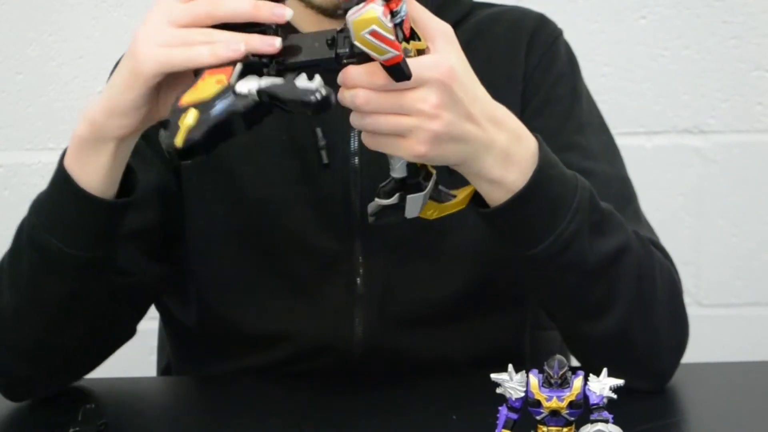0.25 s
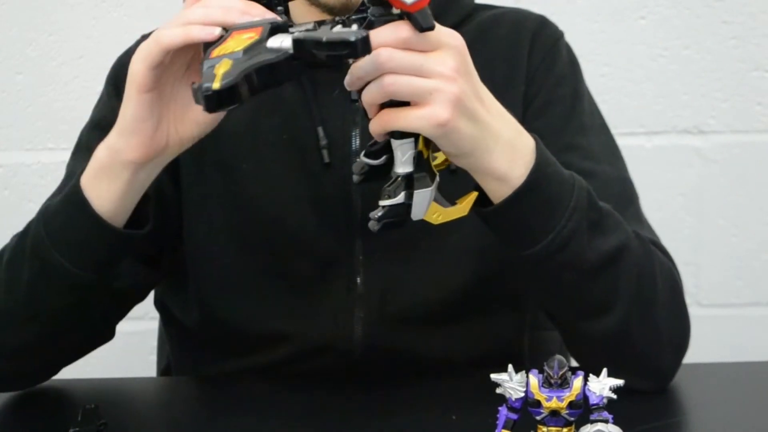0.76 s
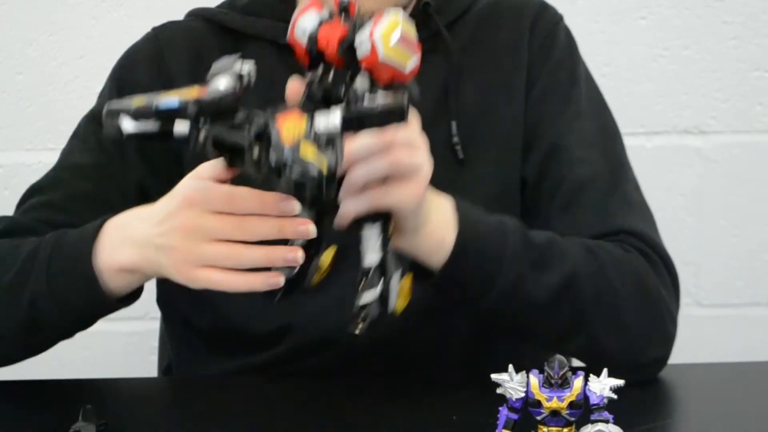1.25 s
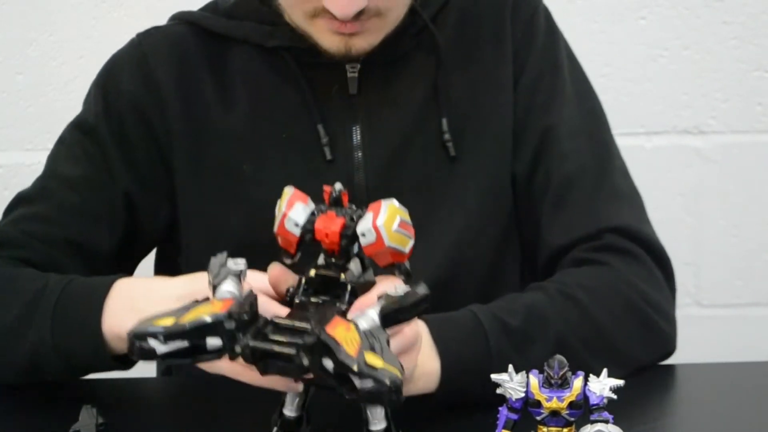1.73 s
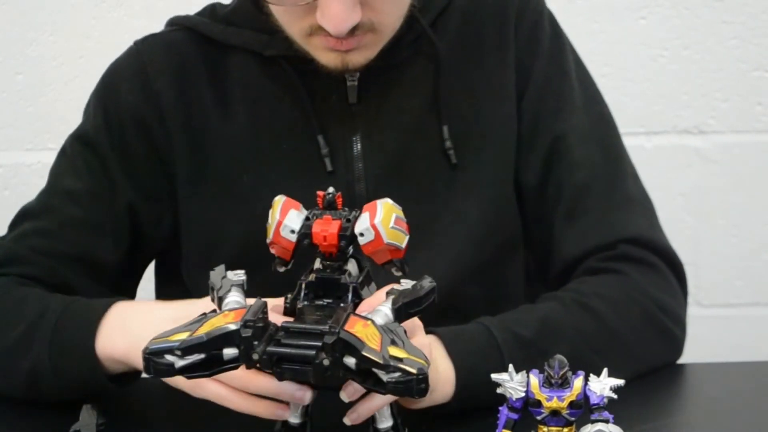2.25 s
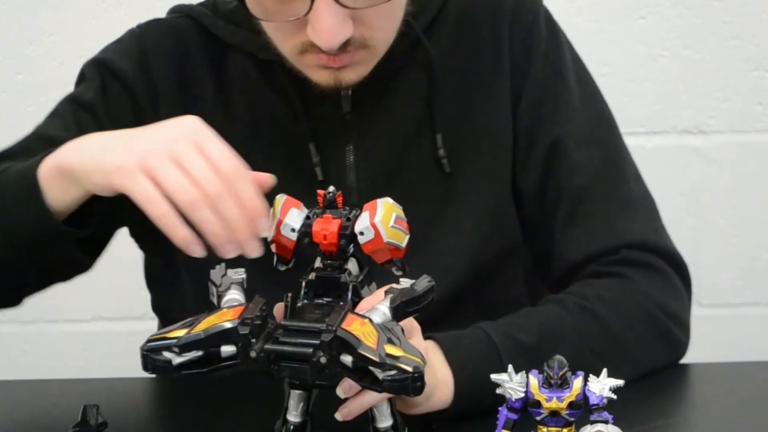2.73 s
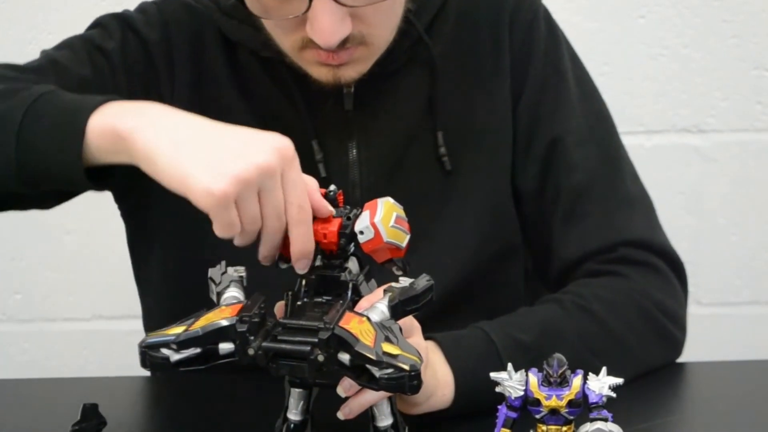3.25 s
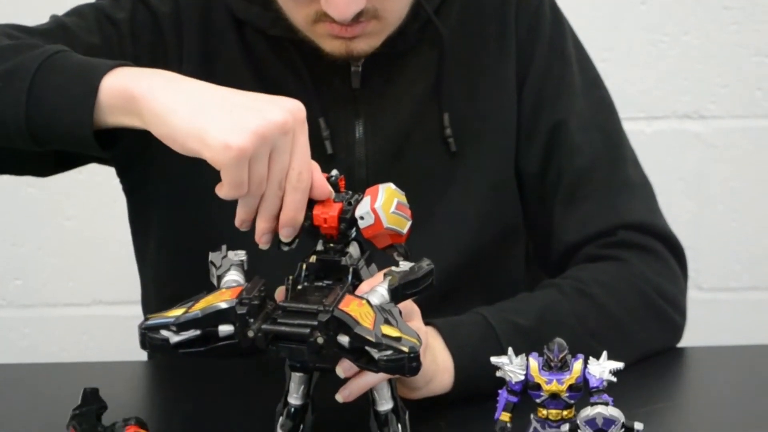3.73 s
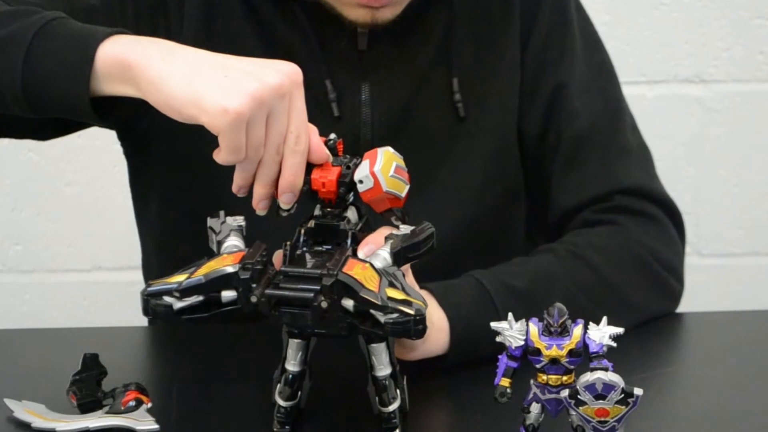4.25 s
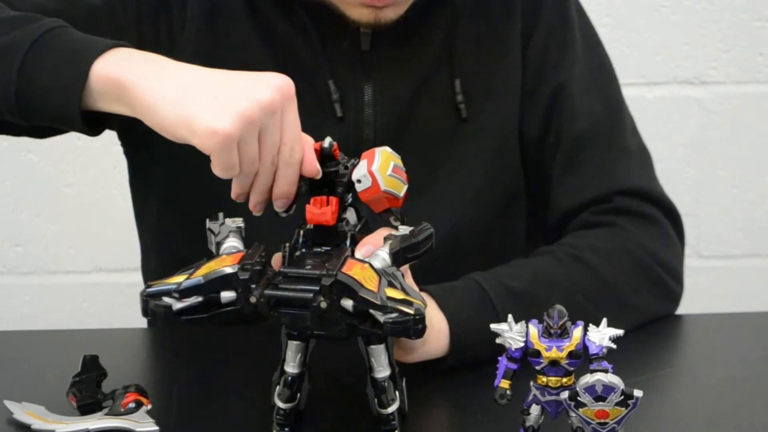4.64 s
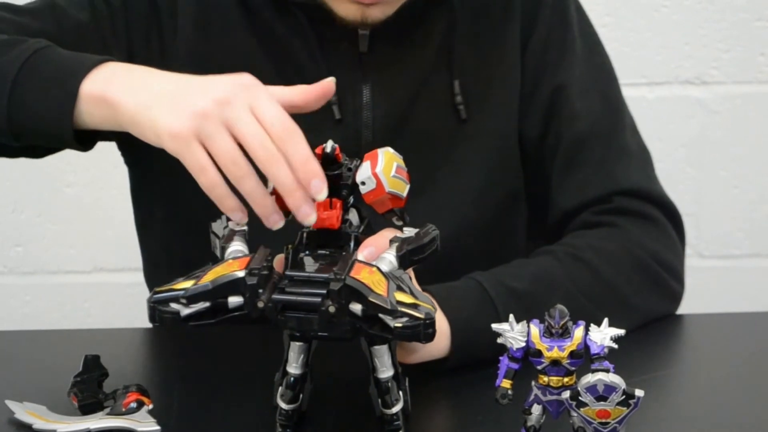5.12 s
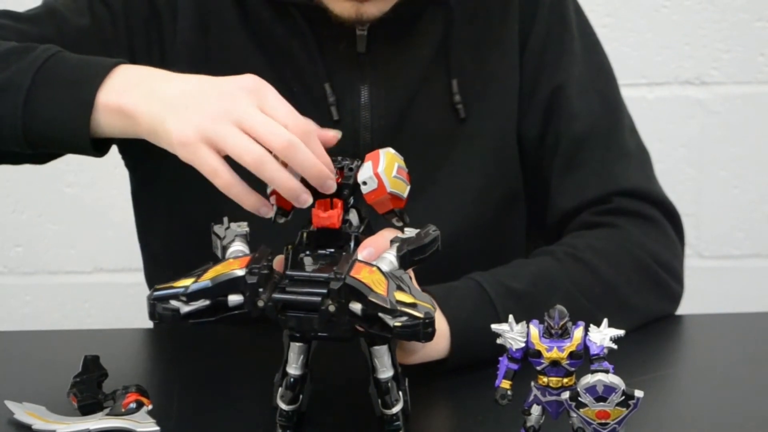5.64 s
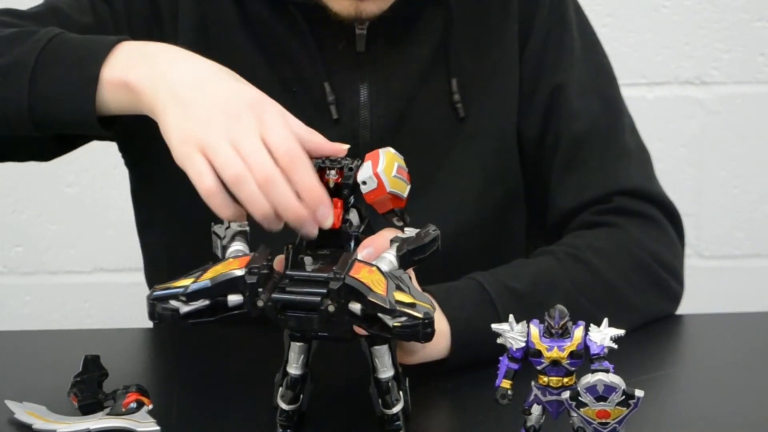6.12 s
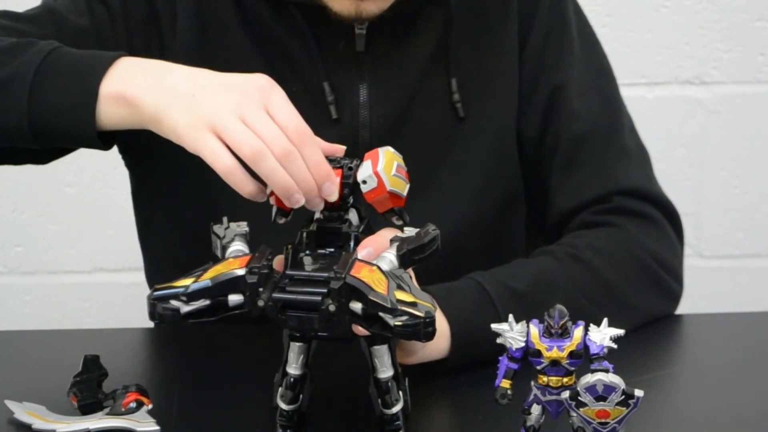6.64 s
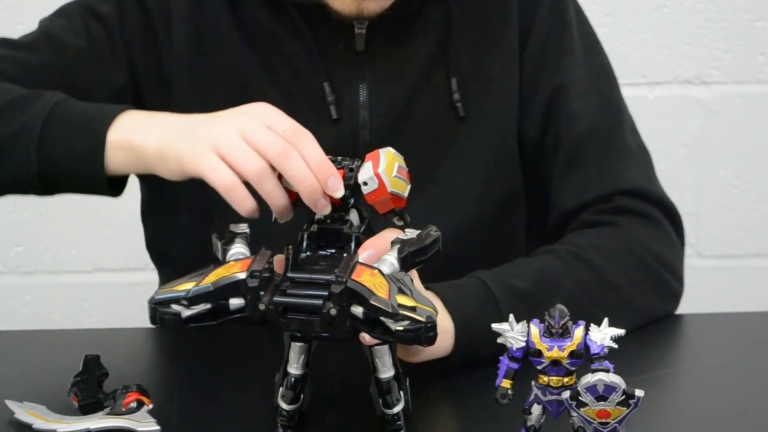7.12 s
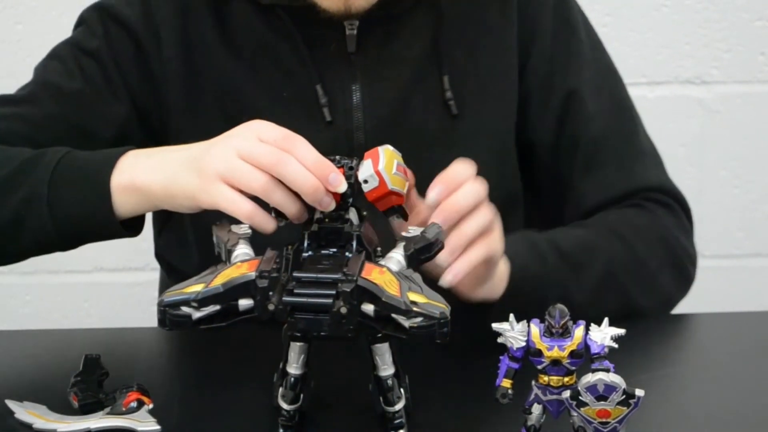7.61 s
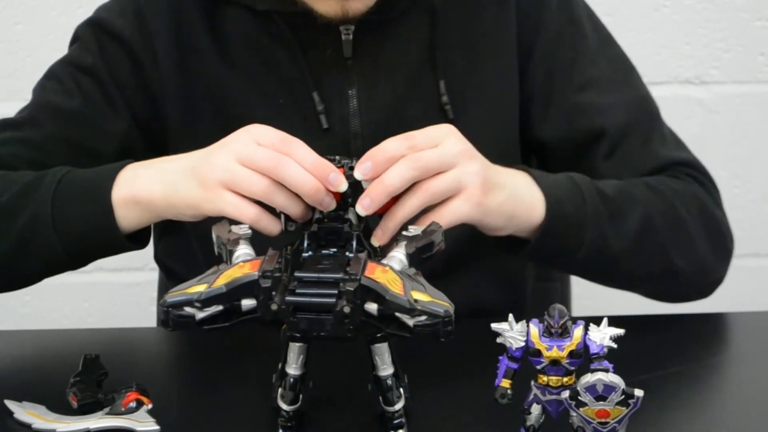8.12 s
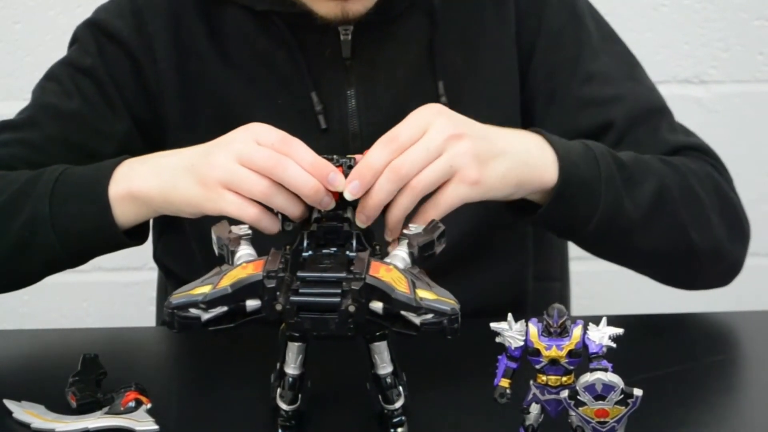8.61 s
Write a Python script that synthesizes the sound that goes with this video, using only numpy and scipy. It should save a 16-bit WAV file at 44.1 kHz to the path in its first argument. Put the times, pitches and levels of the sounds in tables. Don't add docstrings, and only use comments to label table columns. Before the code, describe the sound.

A hard plastic jointed toy is reconfigured by hand at a table, heard from about a metre in a bare room with short, lively echoes and a faint steady air hum. From 0 to 0.5 s loose parts rattle, dull turning sharp, with firm clicks and two brief hollow hinge scrapes gliding downward. It is sparse until about 1.8 s, when the feet clack onto the table with a hollow knock. Quick light ticks cluster at 2-2.7 s, then crisp clicks come irregularly from 2.7 to 4.5 s. At 4.63 s a lid cracks free and stops hard, a very loud double snap. Clicks resume at 4.8-5.7 s, thicken from 6 s, and a lock snaps loudly at 6.73 s. A firm click lands at 7.05 s, followed by lighter touches, a bright click at 8.15 s and final clicks near 8.7-8.8 s.

```python
import sys
import numpy as np
from scipy import signal
from scipy.fft import rfft, irfft
from scipy.io import wavfile

SR = 44100
rng = np.random.default_rng(int(sys.argv[2]) if len(sys.argv) > 2 else 0)


def materialize(psi):
    bounded = np.clip(np.atleast_2d(psi).T, -1, 1)
    quanta = np.round(bounded * 32767).astype(np.int16)
    wavfile.write(sys.argv[1], SR, quanta)


def volts_from_decibels(level):
    exponent = np.asarray(level, float) / 20
    return 10 ** exponent


N = 391166
SIZE = 2048
BINS_HZ = np.arange(SIZE // 2 + 1) * SR / SIZE

# f/Hz, level/dB per Hz
AIR_COLOUR = [(15, -31), (25, -10), (141, -4.5), (218, -10.5), (281, -7), (344, -7), (619, -4.5),
              (862, -7.5), (2450, -9.5), (2640, -9), (3320, -14), (11000, -43), (14300, -66), (22000, -120)]
# f/Hz, level/dB
MICROPHONE = [(30, -16.5), (200, 1), (5600, 0), (6000, 1.5), (7400, 1.5), (8000, -3.5), (8700, 3),
              (10200, -5), (11300, -19), (12200, -52), (13200, -20), (14800, -17), (16000, -53)]
# t/s after the sound, level/dB
ECHOES = [
    (.0029, -7),
    (.0065, -16),
    (.0102, -13),
    (.0222, -12),
    (.0335, -16),
]
# f/Hz, level/dB
FACING = [(200, -10), (1500, -2), (2800, 1), (3400, 3.5), (3900, 2), (4400, 3.5), (5100, 6.5), (5650, 6.5),
          (5900, 1), (12000, -3.5)]
# f/Hz, time to fall 60 dB/s, level/dB
TAIL = [(149, 0.96, -37), (404, 0.76, -26.5), (1040, 0.51, -25.5), (2320, 0.49, -22.5), (4340, 0.5, -26.5),
        (5480, 0.43, -26), (5770, 0.41, -29), (9400, 0.3, -30.5), (14900, .26, -33)]
# f/Hz, width/Hz, level/dB
ROOM_MODES = [(698, 8.1, 13), (1180, 130, 4.5)]
# f/Hz, time to fall 60 dB/s, level/dB
STANDING_WAVES = [(119.5, 0.69, -50), (234, 0.4, -49.5), (294.6, 0.59, -48), (341, 0.39, -52),
                  (455, 0.28, -40.5), (491.6, 0.4, -46.5)]
MOVES_S = 0.3

# t/s, level/dB, dullness/dB
RATTLE = [
    (0.0, -47.5, 7.5),
    (0.34, -46, -41),
    (0.64, -60.5, 7),
    (5.01, -58, 9),
    (5.21, -61.5, 13),
    (6.87, -53, 8.5),
    (7.829, -60, 7),
    (8.87, -60.5, 15),
]
# t/s, level/dB, f/Hz
HINGE = [
    (.085, -60, 1450),
    (.097, -35, 1399),
    (0.139, -42, 1280),
    (.152, -31, 1180),
    (.208, -30, 981),
    (0.254, -43, 930),
    (0.319, -57, 1300),
    (.37, -33, 1250),
    (.44, -48, 1200),
]
# t/s, peak level/dB, f/Hz
HOLLOW_KNOCKS = [(1.1145, -42, 2320), (1.2177, -44, 1160), (1.516, -41, 1670), (1.836, -29, 455),
                 (1.836, -35.5, 342), (3.017, -37, 1520), (3.54, -33, 2400), (3.534, -39, 3100),
                 (5.6923, -40, 1240), (6.0498, -32, 1220), (5.588, -45, 4700), (6.14, -52, 8400),
                 (6.161, -31, 8250), (6.1665, -47, 1704), (7.313, -38, 1040), (8.0366, -33, 2340),
                 (8.151, -30, 2270), (8.154, -25, 7000), (8.6971, -35.5, 2130),
                 (0.0947, -37, 1360), (.0947, -36, 2080), (.15, -53, 2020), (0.151, -35, 1370),
                  (.183, -31, 1380), (0.211, -38, 1370), (0.335, -35, 1440), (0.349, -38, 1830),
                  (1.0502, -47, 1950), (1.7946, -38, 1010), (1.7928, -57, 2150), (1.8335, -22, 690),
                  (1.8665, -38, 1510), (2.109, -35, 3000), (2.251, -36, 2400), (2.7356, -38, 3220),
                  (2.8203, -35, 3400), (3.021, -43, 910), (3.041, -46, 1410), (3.058, -50, 394),
                  (3.0887, -41, 4750), (3.3953, -45, 840), (3.535, -38, 1360), (3.6, -36, 2240),
                  (3.6, -33, 3340), (3.618, -50, 2320), (3.893, -38, 3430), (4.1209, -40, 1100),
                  (4.3844, -37, 1160), (4.6295, -14.5, 2260), (4.633, -37, 460), (4.849, -45, 1160),
                  (5.049, -40, 1180), (5.444, -36, 2220), (6.1641, -34, 4570), (6.6347, -43, 1810),
                  (7.1863, -43, 1210), (8.138, -48, 1200)]

# shortest/s, longest/s
CLOSE_ECHO_S = (.0008, .0036)
SMEAR_S = 0.0011

# lowest f/Hz, highest f/Hz, coupling level/dB
THUD = (213, 615, -3.5)
SHELL = (846, 1433, -5)
PANEL = (1870, 3800, 2.18)
JOINT = (4000, 6330, -6)
TICK = (6030, 9700, 9.97)
# t/s, joint peak level/dB, body level/dB
LIGHT_TOUCHES = [(0.075, -67, 10), (0.3099, -43.5, -2), (0.451, -43.5, -15), (0.4932, -57, 3.5),
                 (0.622, -52.5, -3.5), (1.216, -55.5, 0), (1.2736, -56.5, 0.5), (1.4882, -73, 11),
                 (1.9377, -40, -2.5), (2.0705, -46, -16), (2.1817, -43, -11), (2.248, -45, -4.5),
                 (2.2937, -47, -6), (2.3168, -45.5, -5), (2.3358, -48, -6), (2.5133, -44.5, -8.5),
                 (2.5408, -45, -8), (2.5717, -42, -8.5), (2.591, -39, -18), (2.615, -38.5, -5),
                 (2.6512, -38, -11), (2.782, -48, -15), (3.004, -51.5, -11), (3.5827, -48, -19),
                 (3.797, -52, -1.5), (3.8141, -54, -3), (3.8637, -42.5, -15), (4.101, -46, -17),
                 (4.252, -45.5, -19), (4.3112, -53.5, 0),
                 (5.0964, -48, -11), (5.259, -51.5, -23), (5.3034, -60, -2), (5.3417, -61.5, 2),
           (5.4341, -44.5, -13), (5.5828, -51, 1), (5.9462, -51, -5.5), (6.153, -45, -4), (7.208, -58, -11),
           (7.2781, -43.5, -3), (7.326, -41, -12), (7.4, -45, -19), (7.4283, -49.5, -3),
           (7.5236, -53.5, -1.5), (7.5692, -58, -10), (7.594, -54.5, -5.5), (7.6942, -56.5, -4.5),
           (8.0694, -55, 1.5), (8.3175, -46, -8), (8.33, -48, -11), (8.422, -56, -3), (8.4817, -49, -7),
           (8.5216, -47, -6.5), (8.596, -59, -7), (8.6162, -54, -12), (8.678, -53, -2)]
# t/s, joint peak level/dB; then body, hollow thud and tick
# level/dB against the joint
FIRM_CLICKS = [(0.0943, -35.5, -4.5, -41, -18.5), (0.1485, -34, -4, -42, -12.5),
               (0.2533, -36, -5.5, -58, -14.5), (0.3265, -34.5, -2.5, -35, -7), (0.4233, -38.5, -8.5, -33, -21),
               (0.6552, -49, -2, -17, -5.5), (1.0507, -50, -4, -21, -25), (1.116, -45.5, -8, -25, -20),
               (1.3289, -42.5, -6.5, -21, -12), (1.516, -39.5, -5.5, -29, -11), (1.7927, -34.5, -5, -31, -9),
               (1.9619, -37.5, -9, -11.5, -17), (1.9774, -33, -6.5, -22, -12.5), (2.043, -36, -13, -24, -24),
               (2.0886, -37, -1.5, -21, -11), (2.1489, -33, -10.5, -28, -22), (2.6064, -43, -6, -9, -21),
               (2.6323, -42.5, -9, -10, -21), (2.7356, -28.5, -11.5, -22, -23), (2.76, -36.5, -6.5, -18, -15),
               (2.8203, -31, -11.5, -30, -18.5), (3.0181, -48, 4, -1.5, -20), (3.0874, -46, -8, -15, -18),
               (3.105, -50, -6, -8, -24),
               (3.195, -32.5, -9, -22, -18.5), (3.2579, -36, -6.5, -24, -19), (3.2739, -31.5, -11, -17, -17),
           (3.3946, -30.5, -14, -25, -21.5), (3.5342, -43, 0.5, -9.5, -18), (3.599, -28, -17.5, -26, -23),
           (3.6171, -32, -12, -17, -27), (3.8925, -26.5, -9.5, -19.5, -17.5),
           (4.0194, -40.5, -2.5, -14, -12.5), (4.12, -38.5, -3.5, -10, -9.5), (4.366, -44, -4, -3.5, -6.5),
           (4.3836, -33, -8, -23, -15), (4.5066, -45, -4, -6, -13), (4.8203, -27.5, -11, -31, -18.5),
           (4.849, -35, -22, -33, -17), (4.8882, -35.5, -8, -15.5, -15), (4.937, -28, -7.5, -25, -19),
           (4.9817, -34, -10, -17.5, -17.5), (5.049, -30, -11.5, -21, -23), (5.4448, -31, -9.5, -21.5, -21),
           (5.6943, -54.5, 7, 3, -11), (5.727, -30, -12.5, -23, -22), (5.981, -37, -6, -17, -11),
           (6.012, -37, -14.5, -14, -33),
               (6.1641, -35, -4, -14, -13), (6.253, -38.5, -8.5, -24, -20), (6.2963, -30.5, -9, -20, -17.5),
           (6.453, -30, -9, -17.5, -18.5), (6.5011, -37.5, -2.5, -43, -19), (6.535, -29, -13.5, -18.5, -23),
           (6.5556, -32, -12, -20, -22), (6.6343, -39, -7.5, -25, -18), (6.6801, -37.5, -4.5, -8.5, -20.5),
           (6.7822, -38, -21, -46, -4), (6.827, -33, -38, -19.5, -17), (6.9387, -37.5, -8.5, -22, -17),
           (7.002, -46, -9, -30, -8), (7.0495, -24.5, -11.5, -24, -20.5), (7.0819, -33, -6.5, -31, -18),
           (7.155, -34.5, -12.5, -28, -23), (7.1852, -32, -10.5, -19, -18.5), (7.3127, -50, 2, -6, -13),
           (7.72, -41.5, -16.5, -24, -15), (7.9552, -39.5, -11, -15, -18), (8.0363, -43, -6.5, -12.5, -6),
           (8.152, -27, -15.5, -25.5, -6), (8.6974, -28.5, -13.5, -25, -18.5),
           (8.8216, -33, -13.5, -20, -1)]

# contacts (t/s, peak level/dB), colour of the part (f/Hz, level/dB), time to let go/s
FEET = ([(1.8325, -22), (1.8375, -16.5), (1.8415, -26.5)], [(41, -64), (70, -43), (105, -24.5), (170, -56),
         (385, -33), (460, -5.5), (703, -11.5), (850, -12), (945, -7), (1270, -13.5), (1470, -1.5),
         (1780, -11.5), (1980, -8), (2450, -18), (9090, -27.5), (11000, -43.5), (14300, -79),
         (22000, -120)], 0.00298)
LID_FREE = ([(4.6225, -18), (4.6272, -9.5)], [(88, -25.5), (150, -15.5), (433, 13.5), (857, -12), (2220, 7),
             (3020, 0), (3610, -12), (3950, -4.5), (5080, -8), (9880, -9.5), (11000, -17.5), (14300, -60),
             (22000, -120)], 0.00566)
LID_STOP = ([(4.649, -7), (4.6715, -21.5)], [(88, -55), (150, -11), (193, -48), (231, -17), (382, -18),
             (418, -25), (500, -18), (827, -14.5), (1370, -8.5), (1820, -16.5), (2430, -14.5),
             (5460, -11.5), (7820, -23), (9530, -20.5), (11000, -33), (14300, -63), (22000, -120)], 0.00268)
LOCK = ([(6.7345, -7)], [(41, -79), (70, -42), (107, -28), (178, -31), (229, -13), (501, -25), (703, -11.5),
         (1240, -14), (1940, -13.5), (2660, 0.5), (3900, -14), (4450, -12), (4800, -5), (5200, -22),
         (5710, -21.5), (9290, -11), (11000, -28.5), (14300, -67), (22000, -120)], 0.0023)


def on_log_hz(hz, points_hz, values):
    return np.interp(np.log(np.maximum(hz, 1)), np.log(points_hz), values)


def causal(gain_db):
    cepstrum = irfft(np.log(volts_from_decibels(gain_db)))
    cepstrum[..., 1:SIZE // 2] *= 2
    cepstrum[..., SIZE // 2 + 1:] = 0
    return irfft(np.exp(rfft(cepstrum)))


def colour(points):
    return causal(on_log_hz(BINS_HZ, *np.transpose(points)))


def smear(waves, longest_s):
    late = rng.random((len(waves), 32)) ** 2 * longest_s
    delay_s = np.array([np.interp(BINS_HZ, np.linspace(0, 16000, 32), row) for row in late])
    shift = np.exp(-2j * np.pi * np.cumsum(delay_s, axis=1) * SR / SIZE)
    again_s = np.interp(rng.random((len(waves), 1)), [0, 1], CLOSE_ECHO_S)
    again = 1 + volts_from_decibels(-8) * np.exp(-2j * np.pi * BINS_HZ * again_s)
    return irfft(rfft(waves) * again * shift)


def lay(times, waves, longest_s):
    out = np.zeros(N + SIZE)
    fade = np.cos(np.linspace(0, np.pi / 2, SIZE))
    starts = (np.asarray(times) * SR).astype(int)
    for start, wave in zip(starts, smear(np.array(waves), longest_s)):
        out[start:start + SIZE] += wave * fade
    return out[:N]


def air():
    shape = volts_from_decibels(on_log_hz(np.arange(N // 2 + 1) * SR / N, *np.transpose(AIR_COLOUR)))
    hum = irfft(rfft(rng.standard_normal(N)) * shape, N)
    return hum / hum.std() * volts_from_decibels(-69)


def room_tails(places, size):
    hz, frames_s, noise = signal.stft(rng.standard_normal((places, size)), SR, nperseg=1024)
    band_hz, t60_s, db = np.transpose(TAIL)
    t60_s = np.maximum(on_log_hz(hz, band_hz, t60_s), 0.05)
    fall_db = on_log_hz(hz, band_hz, db)[:, None] - 60 * frames_s / t60_s[:, None]
    weight = volts_from_decibels(2 * fall_db)
    power = np.sum(np.abs(noise) ** 2 * weight, axis=2) / np.sum(weight, axis=1)
    noise = noise / np.sqrt(power / np.mean(np.abs(noise) ** 2))[..., None]
    tails = signal.istft(noise * volts_from_decibels(fall_db), SR, nperseg=1024)[1][:, :size]
    modes_db = sum(db * np.exp(-((BINS_HZ - hz) / width) ** 2) for hz, width, db in ROOM_MODES)
    return signal.fftconvolve(tails, causal(modes_db)[None], axes=1)[:, :size]


def room(places, size=36000):
    early = np.zeros(size)
    early[0] = 1
    for delay_s, echo_db in ECHOES:
        early[int(delay_s * SR)] = volts_from_decibels(echo_db)
    early = signal.fftconvolve(early, colour(FACING))[:size]
    t = np.arange(size) / SR
    tails = room_tails(places, size) * (1 - np.exp(-(t / 0.002) ** 2))
    standing = sum(volts_from_decibels(db - 60 * t / t60) * np.sin(2 * np.pi * hz * t) for hz, t60, db in STANDING_WAVES)
    return early, tails + standing * (1 - np.exp(-t / 0.01))


def reverberate(x, tails):
    hop = int(MOVES_S * SR)
    padded = np.pad(x, (hop, 2 * hop))
    out = np.zeros(N + 4 * hop + tails.shape[1])
    fade = np.sin(np.pi * np.arange(2 * hop) / (2 * hop))
    for k, tail in enumerate(tails):
        wet = signal.fftconvolve(padded[k * hop:(k + 2) * hop] * fade, tail)
        out[k * hop:k * hop + len(wet)] += wet
    return out[hop:hop + N]


def rattle(taps_per_s=600, spread_db=-1.5):
    s, db, dull_db = np.transpose(RATTLE)
    t = np.arange(N) / SR
    taps = (rng.random((2, N)) < taps_per_s / SR) * volts_from_decibels(spread_db * rng.exponential(size=(2, N)))
    taps = taps * np.sign(rng.standard_normal((2, N)))
    joints = signal.butter(1, [1800, 7500], "band", fs=SR, output="sos")
    shells = signal.butter(3, [280, 1500], "band", fs=SR, output="sos")
    sharp = signal.sosfilt(joints, taps[0])
    dull = signal.sosfilt(shells, taps[1])
    mix = sharp / sharp.std() + dull / dull.std() * volts_from_decibels(np.interp(t, s, dull_db) - 7.0)
    return mix * volts_from_decibels(np.interp(t, s, db) - 25.0)


def hinge(width_hz=160, slips_per_s=900):
    s, db, hz = np.transpose(HINGE)
    t = np.arange(N) / SR
    slips = (rng.random(N) < slips_per_s / SR) * rng.standard_normal(N)
    swell = signal.sosfilt(signal.butter(2, width_hz, fs=SR, output="sos"), slips)
    tone = np.sin(2 * np.pi * np.cumsum(np.interp(t, s, hz)) / SR)
    level_db = np.interp(t, s, db, left=-120, right=-120) - 16.5
    return swell / swell.std() * tone * volts_from_decibels(level_db)


def rings(q=10):
    s, db, hz = np.transpose(HOLLOW_KNOCKS)
    cycles = hz[:, None] * np.arange(SIZE) / SR
    fading = np.sin(2 * np.pi * cycles) * np.exp(-np.pi * cycles / q)
    return lay(s, volts_from_decibels(db - 2.5)[:, None] * fading, SMEAR_S)


def clicks(s, db, body_db, thud_db, tick_db):
    low_hz, high_hz, coupling_db = np.transpose([THUD, SHELL, PANEL, JOINT, TICK])
    parts_db = np.transpose([thud_db, 1.564 * body_db, 0.69 * body_db, 0 * db, tick_db])
    parts_db = parts_db + coupling_db - 20 * np.log10(2 * (high_hz - low_hz) / SR)
    edges_hz = np.ravel(np.transpose([1.4 * low_hz, 0.82 * high_hz]))
    gain_db = np.array([on_log_hz(BINS_HZ, edges_hz, np.repeat(row, 2)) for row in parts_db])
    gain_db += on_log_hz(BINS_HZ, [90, THUD[0]], [-35, 0])
    ripple_hz = np.geomspace(200, 16000, 40)
    ripple = rng.standard_normal((len(s), 40))
    gain_db += 1.8 * np.array([on_log_hz(BINS_HZ, ripple_hz, row) for row in ripple])
    return lay(s, causal(gain_db + db[:, None]), SMEAR_S)


def touches(s, db, body_db, set_down_s=1.83):
    thud_db = body_db + np.where(s < set_down_s, -19.5, -9)
    return clicks(s, db, body_db, thud_db, 0 * db - 17.5)


def snap(contacts, points, release_s, tilt_db=0.5):
    hz, db = np.transpose(points)
    housing_db = on_log_hz(11000, *np.transpose(MICROPHONE)) - on_log_hz(hz, *np.transpose(MICROPHONE))
    part_db = db + housing_db + tilt_db * np.log2(hz / 1000)
    wave = colour(np.transpose([hz, part_db])[hz <= 11500])
    wave = wave / np.abs(wave).max()
    times = [s for s, _ in contacts]
    return lay(times, [volts_from_decibels(peak_db + 4.5) * wave for _, peak_db in contacts], release_s)


def scene():
    early, tails = room(int(N / int(MOVES_S * SR)) + 2)
    firm = clicks(*np.transpose(FIRM_CLICKS))
    light = touches(*np.transpose(LIGHT_TOUCHES))
    loud = sum(snap(*part) for part in (FEET, LID_FREE, LID_STOP, LOCK))
    toy = firm + light + loud + rattle()
    hollow = rings() + hinge()
    direct = signal.fftconvolve(toy + hollow, early)[:N]
    echoing = reverberate(toy + volts_from_decibels(-14) * hollow, tails)
    return (direct + echoing + air())[None]


def roll_off(x):
    return signal.sosfilt(signal.butter(12, 16150, fs=SR, output="sos"), x)


def record(dry):
    mix = signal.fftconvolve(dry, colour(MICROPHONE)[None], axes=1)[:, :N]
    return roll_off(mix)


dry = scene()
out = record(dry)
materialize(out)
```